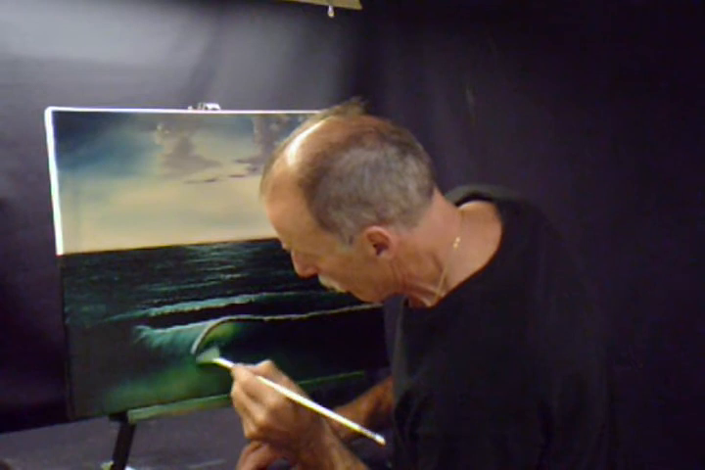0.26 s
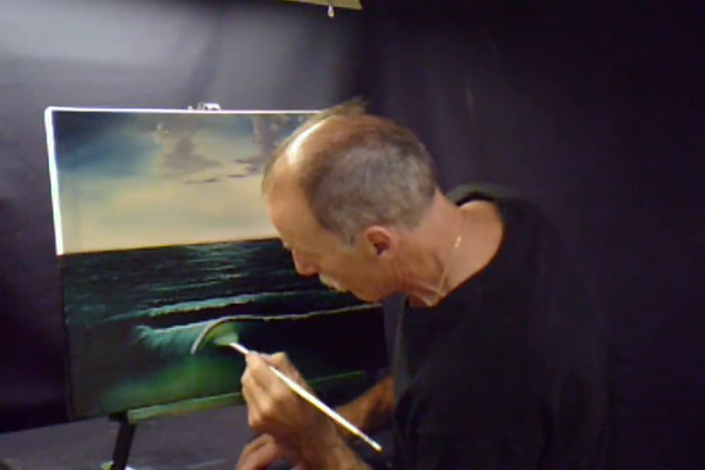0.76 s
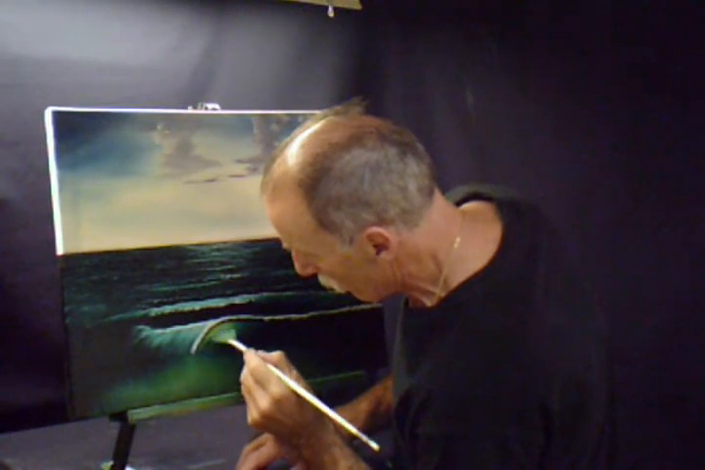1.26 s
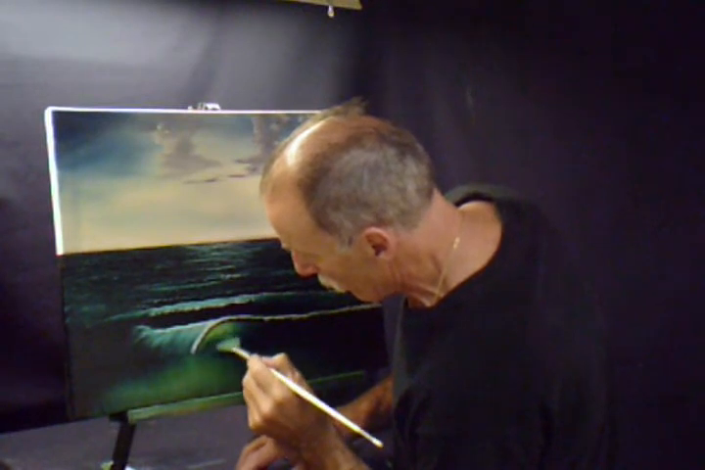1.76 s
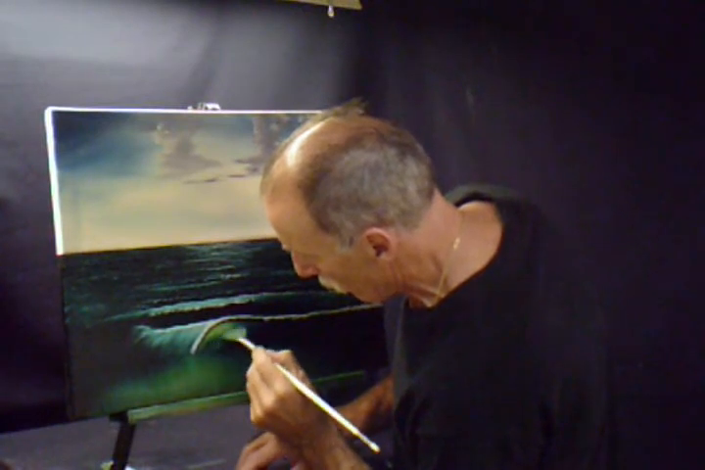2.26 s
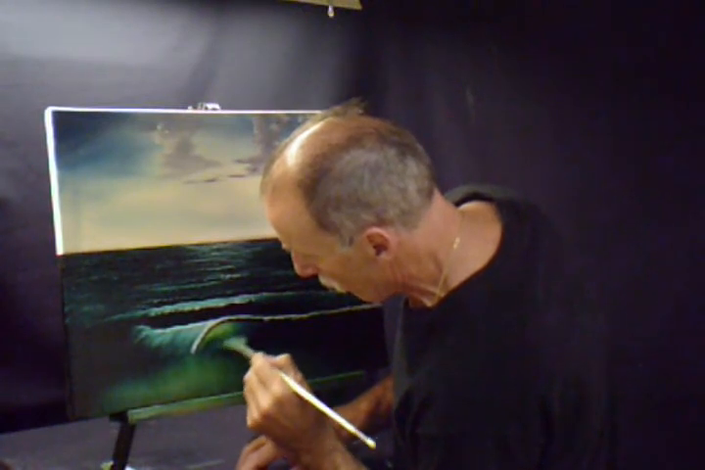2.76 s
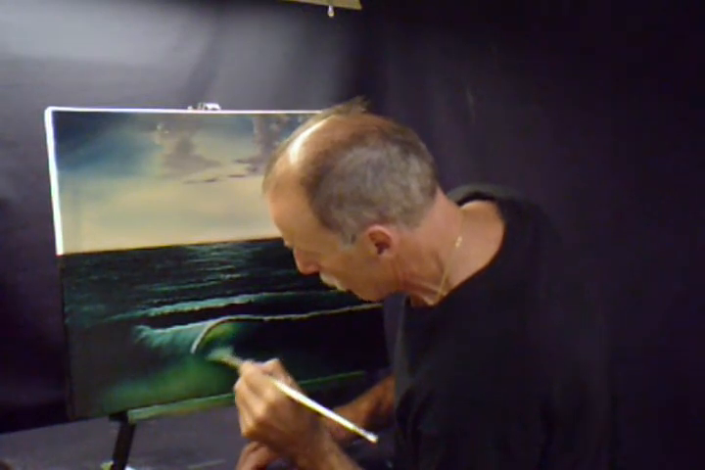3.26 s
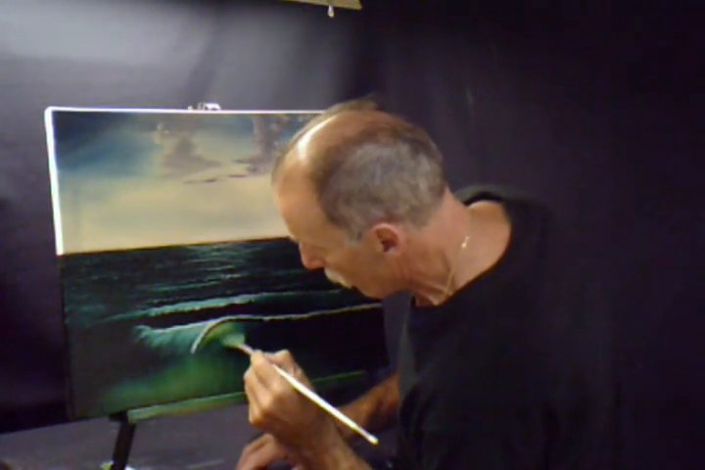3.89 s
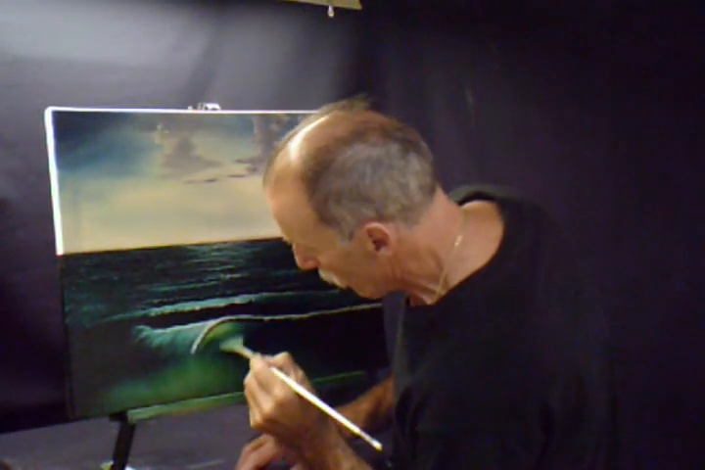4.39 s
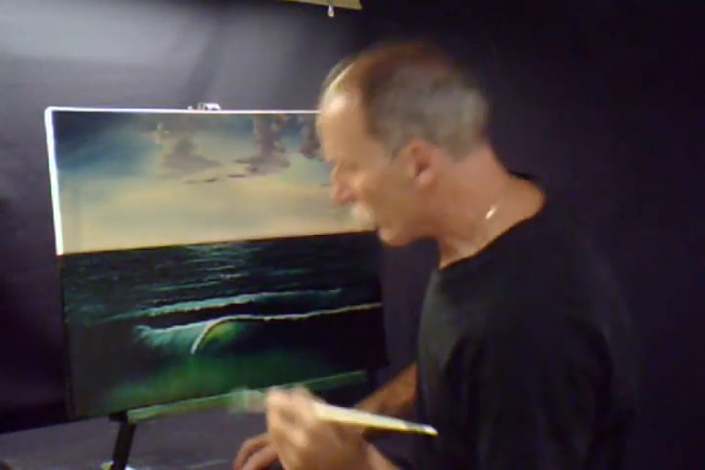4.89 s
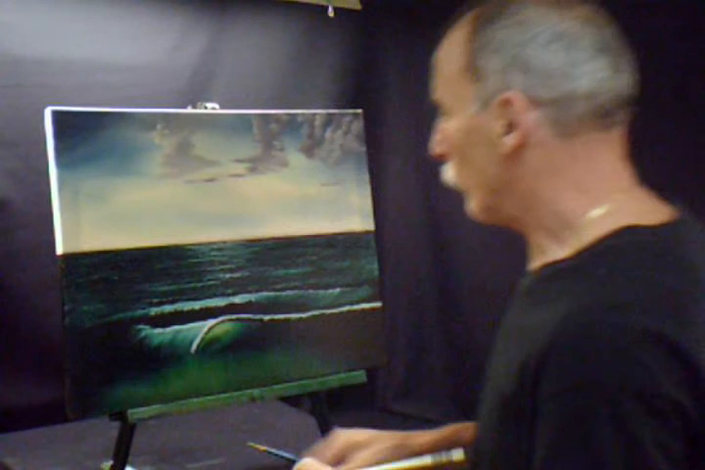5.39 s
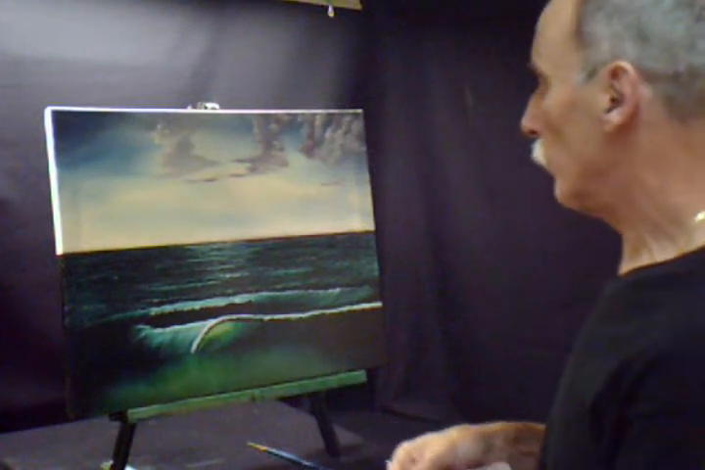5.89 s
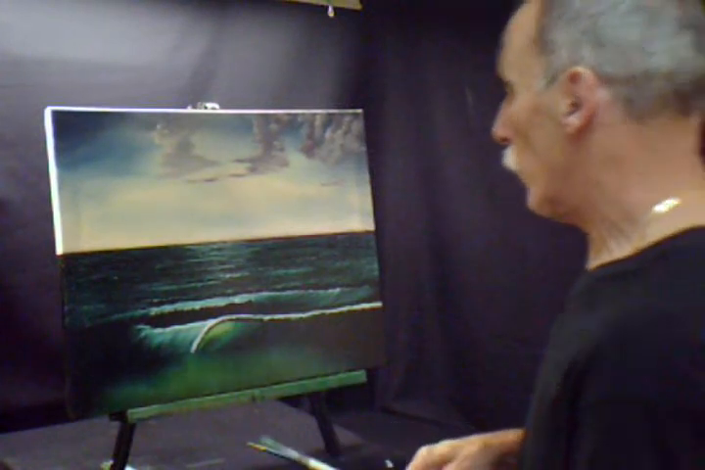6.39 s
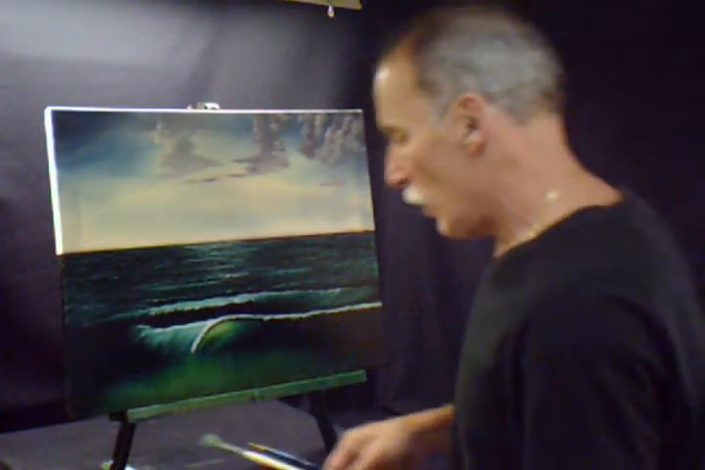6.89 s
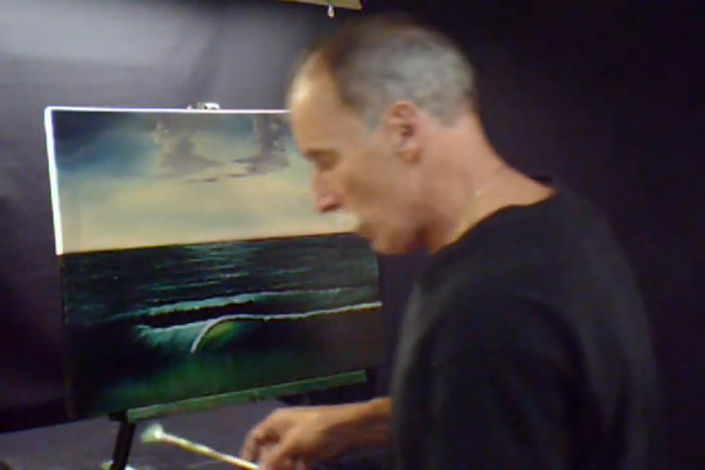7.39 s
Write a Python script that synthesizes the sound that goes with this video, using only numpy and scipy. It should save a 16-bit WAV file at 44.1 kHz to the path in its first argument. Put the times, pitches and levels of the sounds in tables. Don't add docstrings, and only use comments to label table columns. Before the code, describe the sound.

A small camera's electronics thump and chirp five times a second over hiss and thin whines, with faint cloth rustle and a brush knock.

```python
import sys
import numpy as np
from scipy import signal
from scipy.fft import next_fast_len
from scipy.io import wavfile
from scipy.ndimage import uniform_filter1d

SR = 44100
rng = np.random.default_rng(int(sys.argv[2]) if len(sys.argv) > 2 else 0)


def int16_out(signal):
    q = np.round(np.clip(np.atleast_2d(signal).T, -1, 1) * 32767)
    wavfile.write(sys.argv[1], SR, q.astype(np.int16))


def volts_from_decibels(level):
    exponent = np.asarray(level, float) / 20
    return 10 ** exponent


N = 336924
T = np.arange(N) / SR
CYCLE_S, CYCLE_START_S = .05031, .078


def evened(x):
    return x / np.sqrt(np.mean(x ** 2) + 1e-20)


def slow_noise(size):
    return evened(uniform_filter1d(rng.standard_normal(N), size=size))


def add(mix, start_s, sound):
    part = mix[max(round(start_s * SR), 0):][:len(sound)]
    part += sound[:len(part)]


def resonate(x, hz, width_hz):
    turn = np.exp(2j * np.pi * hz * T)
    r = np.exp(-np.pi * width_hz / SR)
    smooth = signal.lfilter([(1 - r) ** 2], [1, -2 * r, r * r], x / turn)
    return 2 * (turn * smooth).real


def busy(busy_share=.55):
    phase = (T - CYCLE_START_S) / CYCLE_S % 1
    return uniform_filter1d((phase < busy_share) * 1., size=130)


# first_s, count, early_ms
LOAD_RUNS = [
    (.0822, 17, 0),
    (3.4048, 19, 2.9),
]
# start_s, length_ms, current_db
SINGLE_LOADS = [(.283, 16.6, 1.1), (.4842, 17.1, 0), (.6849, 15.6, -1.9), (1.2907, 14.9, 1.1),
                (1.6925, 18.3, 0), (2.9005, 16.2, .9), (3.1025, 19.7, -1.7), (3.3043, 16.3, -1.2),
                (3.4016, 17.1, -1.7), (4.6091, 18.9, 0), (4.815, 18, -.5), (5.2165, 15.9, 1.2),
                (5.4171, 15.5, -1), (5.6238, 18.4, -1.9), (6.022, 17.9, 0), (6.2201, 18.7, 0),
                (6.4239, 18.1, .3), (6.6269, 15.9, 1.8)]
# start_s, length_ms, current_db, twitter_db
STUMBLE_LOADS = [
    (7.2319, 8.5, -1.6, -0.5),
    (7.2398, 41.5, -3.9, -7.6),
    (7.2823, 2.0, 3.0, -2.5),
    (7.3323, 3.5, -3.4, -5.7),
    (7.3328, 12.5, -12.8, -9.4),
    (7.5317, 4.8, -3.0, -4.4),
    (7.532, 11.1, -14.8, -7.3),
]


def loads(every_s=.20135, length_ms=16.2, twitter_start_db=2.5, twitter_fade_db_per_s=0.29):
    starts = []
    for first_s, count, early_ms in LOAD_RUNS:
        k = np.arange(count)
        starts.append(first_s + k * every_s - early_ms / 1000 * (1 - k % 2))
    s = np.concatenate(starts)
    rows = np.array([s, length_ms + 0 * s, 0 * s, twitter_start_db - twitter_fade_db_per_s * s]).T
    for stray in SINGLE_LOADS:
        rows[abs(s - stray[0]).argmin(), :3] = stray
    return [*rows, *STUMBLE_LOADS]


def heavy(surge=0., surge_fade_ms=5., level_db=.7):
    current = np.zeros(N)
    fade = np.exp(-np.arange(1500) * 1000 / SR / surge_fade_ms)
    for start_s, length_ms, db, _ in loads():
        add(current, start_s, np.full(round(length_ms * SR / 1000), volts_from_decibels(db)))
        add(current, start_s, volts_from_decibels(db) * surge * fade)
    return volts_from_decibels(level_db) * uniform_filter1d(current, size=60)


# pitch_hz, level_db
RIPPLE_TONES = [(43.07, -23), (86.13, -25.5), (129.2, -34.5), (172.3, -66), (215.3, -35.5)]


def rail(jitter_db=-2.5, lumps_db=0.5, drift_db=-21.0, heavy_jitter_db=6.,
         recovery_ms=8.45, coupling_hz=6.64, surge=.4):
    lumps = volts_from_decibels(lumps_db * slow_noise(300) + heavy_jitter_db * heavy())
    jitter = volts_from_decibels(jitter_db) * evened(lumps * rng.standard_normal(N))
    drift = volts_from_decibels(drift_db) * slow_noise(350)
    ripple = sum(volts_from_decibels(db) * np.sin(2 * np.pi * (hz * T + rng.random())) for hz, db in RIPPLE_TONES)
    wobble = 1 + .5 * slow_noise(4000)
    waiting = np.clip(4 * uniform_filter1d(heavy(), size=1400, origin=400), 0, .45)
    light = jitter + (1 - waiting) * (drift + wobble * ripple)
    r = np.exp(-1000 / recovery_ms / SR)
    c = np.exp(-2 * np.pi * coupling_hz / SR)
    sag = signal.lfilter([r - 1], [1, -r], heavy(surge=surge) + light)
    return signal.lfilter([1, -1], [1, -c], sag)


# pitch_hz, level_db (per Hz)
HISS_COLOUR = [(300, -29), (600, -14), (1100, -13), (1800, -8), (3000, -8.5), (6000, -8.5), (9500, -11.5),
               (11000, -8), (14000, -10.5)]


def hiss(level_db=-48.5, busy_db=2.5, treble_busy_db=0.0, heavy_db=-2.0, flicker_db=0.0,
         patchy_db=2.0, top_flicker_db=2.0):
    frames, hz = N // 64 + 5, np.fft.rfftfreq(256, 1 / SR)
    at = np.minimum(np.arange(frames) * 64, N - 1)
    a, b, patches = rng.standard_normal((frames, 129, 3)).T
    patches = uniform_filter1d(patches, size=6, axis=0)
    patches = evened(uniform_filter1d(patches, size=8, axis=1))
    flicker = evened(uniform_filter1d(rng.standard_normal(frames), size=3))
    colour_hz, colour_db = np.transpose(HISS_COLOUR)
    depth_db = busy_db + treble_busy_db * np.clip((hz - 5000) / 4000, 0, 1)
    flicker_depth_db = flicker_db + top_flicker_db * np.clip(hz / 3000 - 3, 0, 1)
    field_db = np.interp(np.log(hz + 1), np.log(colour_hz), colour_db)[:, None]
    field_db = field_db + depth_db[:, None] * busy()[at]
    field_db = field_db + heavy_db * uniform_filter1d(heavy(), size=300)[at]
    field_db = field_db + flicker_depth_db[:, None] * flicker + patchy_db * patches
    noise = signal.istft((a + 1j * b) * volts_from_decibels(field_db), nperseg=256, noverlap=192)[1][:N]
    return volts_from_decibels(level_db) * evened(noise)


# pitch_hz, width_hz, level_db
TRACE_RINGS = [(3310, 310, -6.5), (5980, 420, 5.5), (6850, 250, 1.5), (7820, 450, -3.5), (9520, 770, 0),
               (10140, 900, -3), (12400, 2000, 1)]


def twitter(level_db=-52.5, throb_hz=165.0, throb=0.46, light_db=-26.0, steady=0.37):
    gate = volts_from_decibels(light_db) * busy()
    for start_s, length_ms, _, db in loads():
        t = np.arange(round((length_ms + 3) * SR / 1000)) / SR
        swell = np.minimum(t / 0.007, 1) * np.minimum((t[-1] - t) / 0.00067, 1)
        throbs = 1 - throb * np.cos(2 * np.pi * throb_hz * (t - .001))
        add(gate, start_s - .002, volts_from_decibels(db) * swell * throbs)
    noise, ring = rng.standard_normal(N), np.zeros(N)
    for hz, width_hz, db in TRACE_RINGS:
        z = signal.hilbert(evened(resonate(noise, hz, width_hz)), next_fast_len(N))[:N]
        tone = evened(z.real / abs(z) ** steady)
        lag_ms = np.clip((hz - 4200) / 1000 * .7, 0, 3.2)
        ring += np.roll(gate, round(lag_ms * SR / 1000)) * volts_from_decibels(db) * tone
    return volts_from_decibels(level_db) * ring


# pitch_hz, level_db
INPUT_FILTER = [(0, -1), (9600, 4), (10500, -5), (11500, -10), (12750, -12.5), (13150, -36), (13800, -44),
                (14300, -84)]


def input_filter_db(hz):
    return np.interp(hz, *np.transpose(INPUT_FILTER))


# pitch_hz, level_db
CLOCK_TONES = [(4199, -73), (5959, -71), (6853, -73), (7768, -73), (9216, -71), (9598, -69), (12452, -85),
               (12834, -93)]


def whines(lift_db=7.5, idle=0.22):
    tones = np.zeros(N)
    for hz, db in CLOCK_TONES:
        before_filter_db = db + lift_db - input_filter_db(hz)
        tones += volts_from_decibels(before_filter_db) * np.sin(2 * np.pi * (hz * T + rng.random()))
    return tones * (idle + (1 - idle) * busy())


# time_s, level_db
RUSTLE_EFFORT = [
    (0, -66),
    (2.5, -55.5),
    (2.9, -71),
    (4.2, -56.5),
    (5.5, -55.5),
    (5.8, -65),
    (6.8, -64),
    (7.64, -60),
]
# pitch_hz, width_hz, level_db
CLOTH_TONES = [(1030, 340, 5), (1750, 620, 3.5), (3000, 1900, 0.5)]
# middle_s, half_length_s, lift_db
ARM_SWISHES = [
    (5.55, 0.039, 4),
    (5.7, 0.084, 13),
    (6.3, 0.47, 2),
]


def rustle(grain_db=3.0):
    grit = rng.standard_normal(N) * volts_from_decibels(grain_db * slow_noise(200))
    body = sum(volts_from_decibels(db) * evened(resonate(grit, hz, width_hz)) for hz, width_hz, db in CLOTH_TONES)
    effort_db = np.interp(T, *np.transpose(RUSTLE_EFFORT))
    for middle_s, half_s, lift_db in ARM_SWISHES:
        effort_db = effort_db + lift_db * np.clip(2 - 2 * abs(T - middle_s) / half_s, 0, 1)
    return volts_from_decibels(effort_db) * evened(body)


# start_s, length_ms, from_hz, to_hz, level_db
BEAT_SLIDES = [(.526, 16, 1500, 8050, -45), (.545, 10, 9000, 11000, -45), (.638, 7, 10000, 8000, -45),
               (2.036, 12, 10200, 7000, -50), (2.141, 14, 3600, 5600, -45), (3.444, 6, 10500, 7400, -46),
               (3.108, 6, 3000, 6150, -40), (3.144, 11, 3800, 7630, -40), (3.156, 11, 7600, 8500, -43),
               (3.167, 5, 8500, 11500, -43), (3.345, 15, 3780, 9600, -45), (3.45, 10, 7300, 8000, -43),
               (3.46, 6, 8000, 10600, -48), (3.653, 18, 3820, 9400, -48), (3.853, 14, 2850, 6600, -45),
               (7.243, 34, 9800, 10400, -46), (7.245, 33, 7600, 7900, -49), (7.243, 36, 12400, 11900, -47),
               (7.27, 20, 5600, 6170, -53)]


def sweeps(faint_db=-52.0, spread_db=6.0, wander_hz=244.0):
    out, rows = np.zeros(N), list(BEAT_SLIDES)
    wander = wander_hz * evened(uniform_filter1d(rng.standard_normal(N + SR), size=90))
    for k, (when, length, pitch, slide, loudness) in enumerate(rng.random((int(N / SR / CYCLE_S), 5))):
        start_s = CYCLE_START_S + (k + 0.91 * when) * CYCLE_S
        from_hz = 3000 + 8000 * pitch
        to_hz = np.clip(from_hz + 8000 * (slide - .3), 1500, 13000)
        rows.append((start_s, 5 + 10 * length, from_hz, to_hz, faint_db + spread_db * (2 * loudness - 1)))
    for start_s, length_ms, from_hz, to_hz, db in rows:
        hz = np.linspace(from_hz, to_hz, round(length_ms * SR / 1000))
        hz = hz + wander[round(start_s * SR):][:len(hz)]
        tone = np.sin(2 * np.pi * np.cumsum(hz) / SR)
        add(out, start_s, volts_from_decibels(db) * tone * signal.windows.tukey(len(hz), .3))
    return out


# start_s, peak_db, brightness_db (per octave)
BRUSH_KNOCKS = [(5.539, -29.5, 4), (5.553, -49, 11), (7.167, -34, 2), (7.172, -25.5, 4), (7.178, -23, -11),
                (7.19, -25.5, -16), (7.198, -33, -3), (7.205, -30, -3), (7.214, -31, -1), (7.223, -33, -6),
                (7.244, -37, -11)]
# pitch_hz, level_db, t60_s
HANDLE_MODES = [(146, -18, 0.039), (253, 2, 0.033), (480, -9, 0.017), (710, -1, 0.011), (990, -10, 0.033),
                (1330, -17, 0.011), (1760, -13.5, 0.016)]


def brushes(lift_db=1.5, scuff_ms=9.1):
    out, t = np.zeros(N), np.arange(2500) / SR
    scuff_t = t[:1200]
    scuff_shape = np.minimum(scuff_t / 0.0018, 1) * np.exp(-scuff_t * 1000 / scuff_ms)
    for start_s, peak_db, bright_db in BRUSH_KNOCKS:
        ring = np.zeros(len(t))
        for hz, db, t60_s in HANDLE_MODES:
            detune = rng.uniform(0.9, 1.16)
            decay_db = db + bright_db * np.log2(hz / 500) - 60 * t / t60_s
            ring += volts_from_decibels(decay_db) * np.sin(2 * np.pi * hz * detune * t)
        touch = signal.oaconvolve(ring, rng.standard_normal(1200) * scuff_shape)
        add(out, start_s, volts_from_decibels(peak_db + lift_db) * touch / abs(touch).max())
    return out


def scene():
    return (rail() + hiss() + twitter() + sweeps() + brushes() + rustle())[None]


# start_s, lands_at_db, wait_s
GAIN_CUTS = [(0, -5, 0), (.5185, -6.8, .16), (1.128, -5.4, 0), (1.7317, -6.1, 0), (2.1381, -6.3, 0),
             (2.9392, -9.2, .29), (3.8448, -6.4, .03), (4.4485, -4.3, .17), (4.8316, -4.6, 0),
             (5.0522, -3.9, .18), (5.4237, -.4, .04), (5.4585, -3.2, .15), (5.8533, -3.6, 0),
             (6.0623, -4.6, .03), (6.2596, -5.4, 0), (6.666, -6.8, .13), (7.2, -3.6, .44)]


def creeping_gain(creep_db_per_s=8., block=256, block_start=82):
    start_s, lands_db, wait_s = np.transpose(GAIN_CUTS)
    block_s = (((np.arange(N) - block_start) // block + .5) * block + block_start) / SR
    last = np.maximum(np.searchsorted(start_s, block_s) - 1, 0)
    creeping_s = np.maximum(block_s - start_s[last] - wait_s[last], 0)
    gain_db = lands_db[last] + creep_db_per_s * creeping_s
    return uniform_filter1d(volts_from_decibels(gain_db), size=3)


def roll_off(x):
    return signal.sosfilt(signal.butter(12, 13830, fs=SR, output="sos"), x)


def record(dry, offset=.074, converter_db=-59):
    gained = (dry + offset) * creeping_gain()
    gained = gained + whines() + volts_from_decibels(converter_db) * rng.standard_normal(N)
    blocked = signal.lfilter([1, -1], [1, -np.exp(-np.pi / SR)], gained - gained[:, :1])
    grid_hz = np.linspace(0, SR / 2, num=128)
    taps = signal.firwin2(127, grid_hz, volts_from_decibels(input_filter_db(grid_hz)), fs=SR)
    return roll_off(signal.oaconvolve(blocked, taps[None], "same"))


dry = scene()
out = record(dry)
int16_out(out)
```